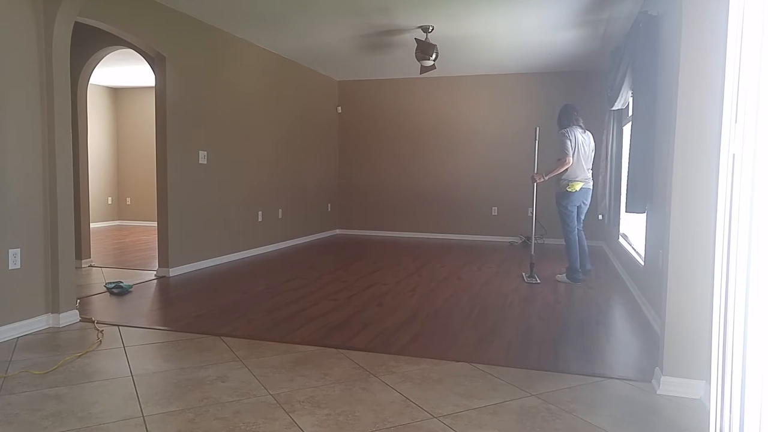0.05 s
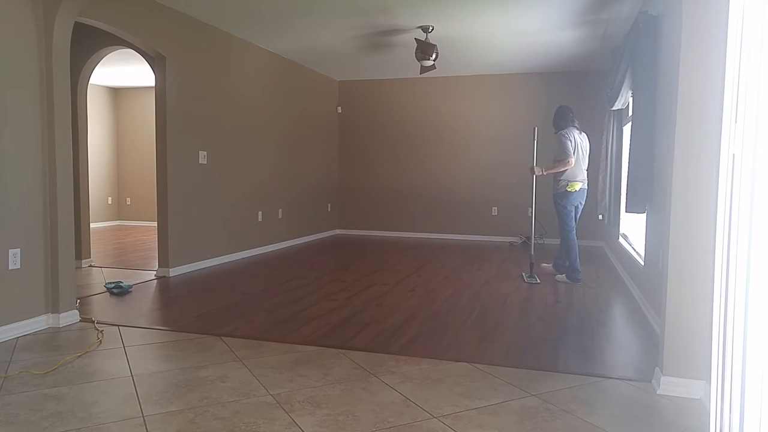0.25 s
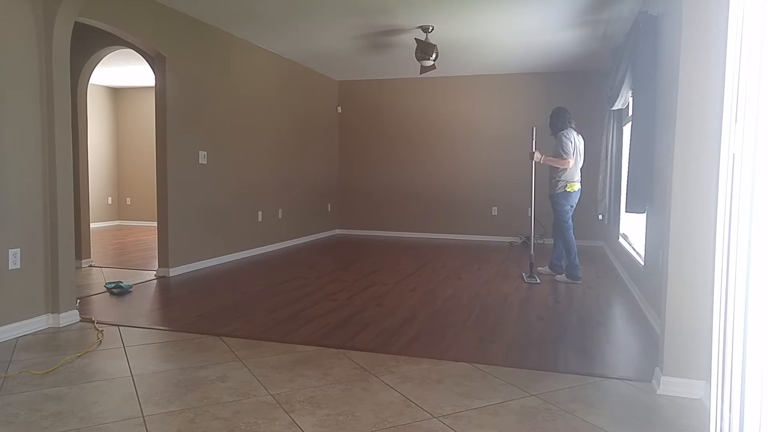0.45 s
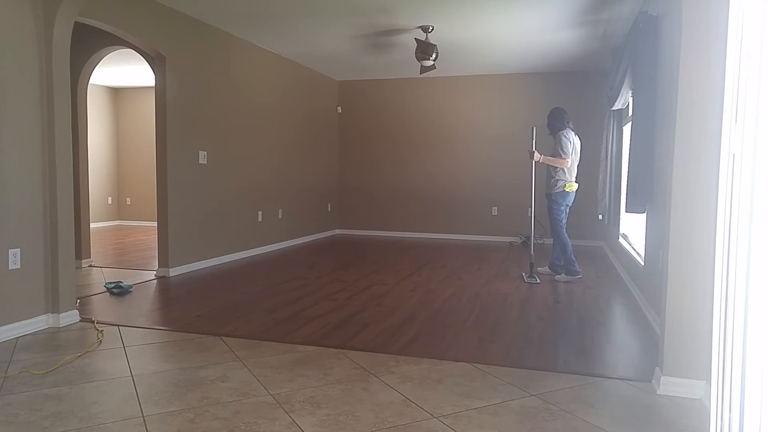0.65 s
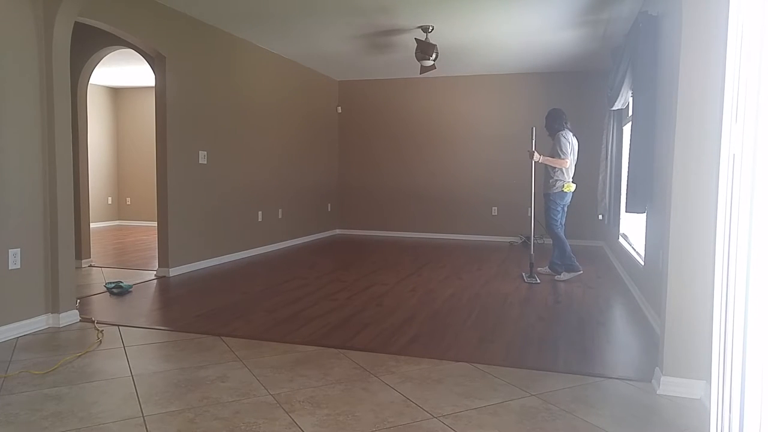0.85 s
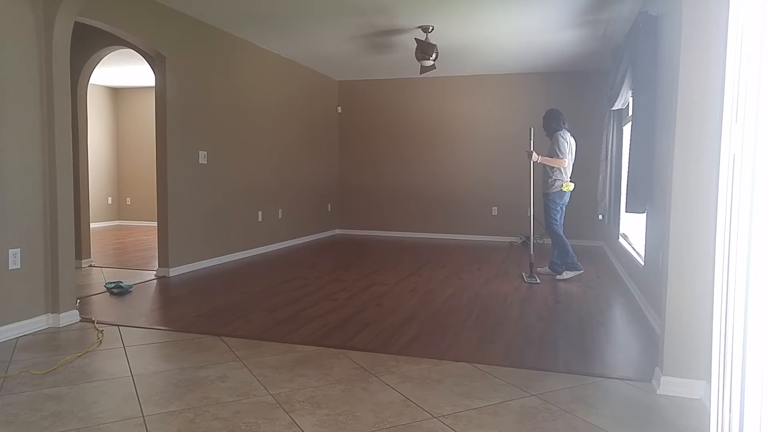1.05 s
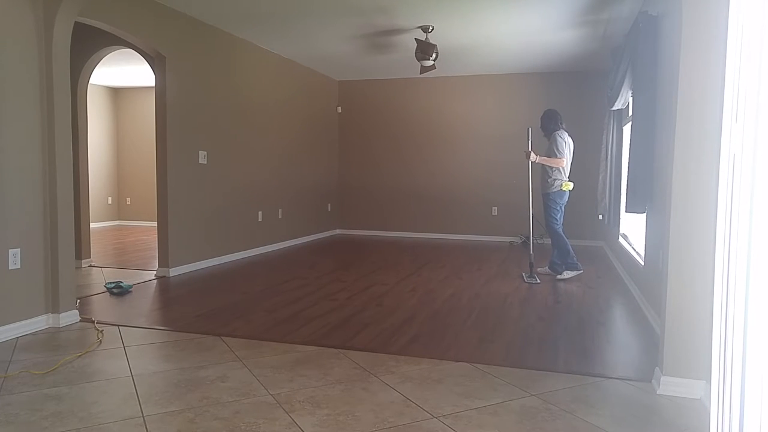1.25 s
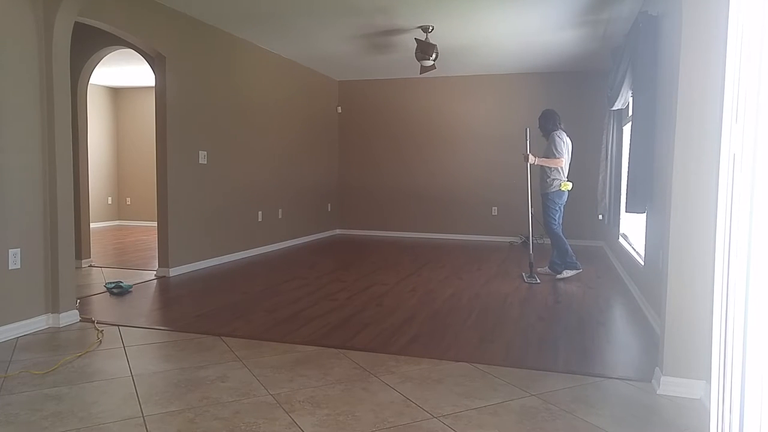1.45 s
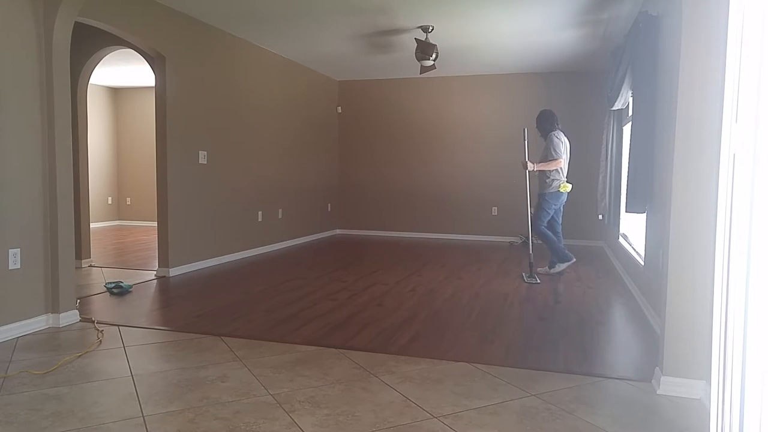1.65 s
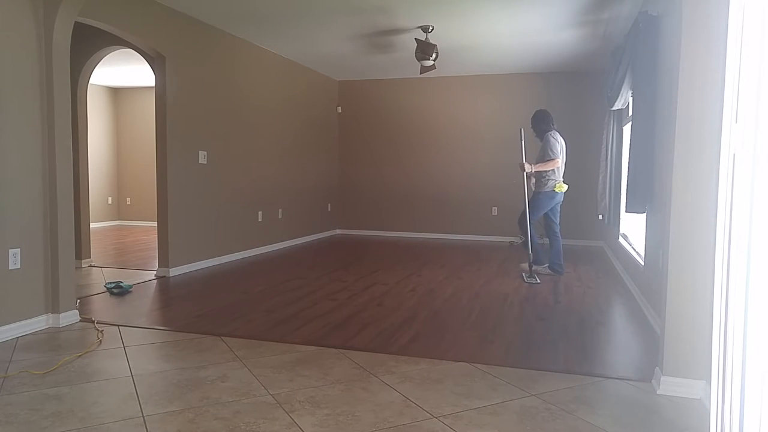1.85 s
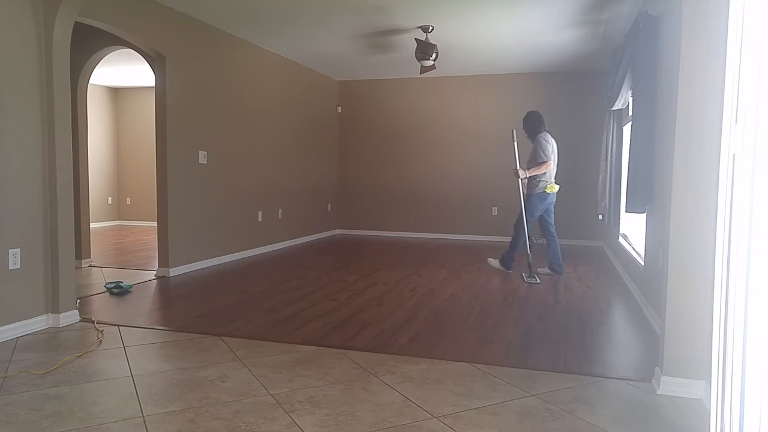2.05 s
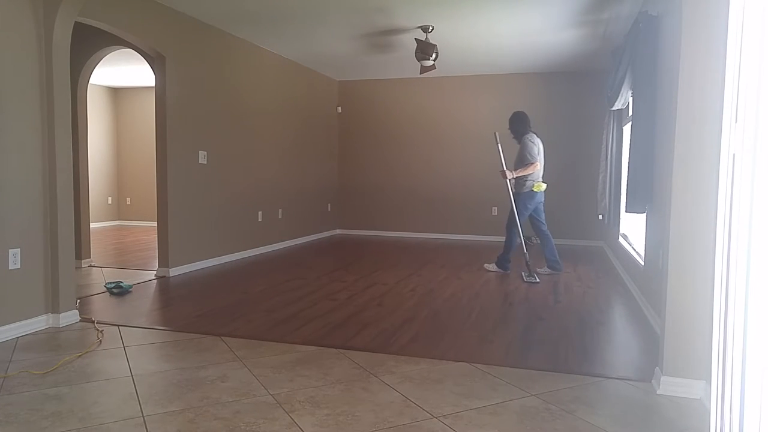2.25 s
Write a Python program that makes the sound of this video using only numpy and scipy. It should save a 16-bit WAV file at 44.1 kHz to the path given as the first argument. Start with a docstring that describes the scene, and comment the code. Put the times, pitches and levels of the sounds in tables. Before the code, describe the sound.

Heard from the far side of a bare, echoing room, a floor mop clacks against the boards, taps lightly and rubs along them. Its swivel joint gives a quick run of ticks near the end, over faint ventilation rumble.

```python
"""A long-handled floor tool rubs softly over laminate at the far side of an empty, echoing room.
At 0.2 s its head knocks and chatters, the boards thump and its loose swivel joint rattles; by 0.4 s it
settles with dull taps. It slides on, catching around 1.5 s, and at 1.8 s the joint sticks and slips in
a quick run of ticks. Throughout, two microphones hear mostly the room, over a low ventilation rumble."""
import numpy as np
import sys
import numpy as np
from scipy import signal
from scipy.fft import rfft, irfft, next_fast_len
from scipy.io import wavfile

SR = 44100
rng = np.random.default_rng(int(sys.argv[2]) if len(sys.argv) > 2 else 0)


def master_out(mix):
    """Clip the mix to full scale and print it as 16-bit PCM to the path in sys.argv[1]."""
    frames = np.transpose(np.atleast_2d(mix))
    ceiling = np.clip(frames, -1, 1)
    pcm = np.round(ceiling * 32767).astype(np.int16)
    wavfile.write(sys.argv[1], SR, pcm)


N = 101429
TIME = np.arange(N) / SR
FFT_SIZE = next_fast_len(N + SR // 10)
FFT_HZ = np.fft.rfftfreq(FFT_SIZE, 1 / SR)
LN_1000 = np.log(1000)  # amplitude falls a thousandfold (60 dB) in one T60

# Impact and rebounds of the head: t/s, level/dB (levels in all tables are relative)
IMPACTS = [(0.205, 2.5), (0.2111, -6.5), (.2222, -10.5), (0.2301, -9), (0.2451, -12)]
# Modes of head and boards: f/Hz, level/dB, T60/s
IMPACT_MODES = [(242, -28, .12), (355, -27.5, 0.072), (388.8, -20, 0.093), (633.5, -18, 0.066),
                (700, -27, .06), (756, -17, 0.026), (829, -8.5, 0.021), (910, -14, 0.024),
                (1040, -13, 0.018), (1280, -26, 0.035), (1402, -24, 0.024), (1853, -44, 0.069),
                (2233, -34.5, 0.042)]
# Spectrum of one contact's crack: f/Hz, level/dB
CRACK_SPECTRUM = [(60, -34), (140, -30), (280, -4.5), (380, -29), (500, -3.5), (900, 11.5), (1500, 1),
                  (2500, -6), (3100, -14.5), (4500, -14), (10000, -19.5), (15000, -43)]
def knock(crack_db=11.5, scatter_db=0.5):
    """Impact excitation: each contact cracks and rings the modes in a mix of its own."""
    sound = from_db(crack_db) * colour(clicks(IMPACTS), CRACK_SPECTRUM)
    times, levels = np.transpose(IMPACTS)
    for hz, db, t60 in IMPACT_MODES:
        delay = rng.random(len(times)) / hz  # rebounds meet the mode at a random phase
        delay[0] = 0
        scatter = scatter_db * rng.standard_normal(len(times))
        sound = sound + ring(clicks(zip(times + delay, levels + scatter)), [(hz, db, t60)])
    return low_cut(sound, hz=352)

# Low modes of the floating boards: f/Hz, level/dB, T60/s
BOARD_MODES = [(302, -26, 0.054), (368.7, -20, 0.22)]
def thump():
    """Free vibration: the boards ring on after the first blow."""
    return low_cut(ring(clicks(IMPACTS[:1]), BOARD_MODES), hz=352)

# Contacts of the settling head: t/s, level/dB
SETTLING_TAPS = [(.368, -7), (.381, -6), (.4085, 0)]
# Modes they excite: f/Hz, level/dB, T60/s
SETTLING_MODES = [(750, -29, .04), (900, -38, .02)]
def settling():
    """Damped resonance: light contacts ring briefly as hollow taps."""
    return low_cut(ring(clicks(SETTLING_TAPS), SETTLING_MODES), hz=360)

# Spectrum of the joint's rattle: f/Hz, level/dB
RATTLE_SPECTRUM = [(1500, -3), (3000, -4.5), (4200, 0), (5500, -20), (7000, 2.5), (10000, -5.5),
                   (12000, -12), (15000, -33)]
# Slips of the joint: t/s, level/dB
SLIPS = [(1.8290, -8), (1.8319, -8), (1.8363, 1), (1.8402, -4.5), (1.8446, -13), (1.8508, -9)]
# Modes of the joint: f/Hz, level/dB, T60/s
SWIVEL_MODES = [(5400, -43, .004), (6600, -26, .005), (7100, -24.5, .005), (8700, -34, .004),
                (9700, -34, .004)]
def swivel(rattle_db=-21, centre_s=.215, width_s=.0032):
    """Backlash and stick-slip: the loose joint rattles from the knock; later each slip rings a tick."""
    shake = np.exp(-.5 * ((TIME - centre_s) / width_s) ** 2)
    rattle = colour(rms_one(grains(per_s=830)) * shake, RATTLE_SPECTRUM)
    return from_db(rattle_db) * rattle + ring(clicks(SLIPS), SWIVEL_MODES)

# Envelopes of the head's rub and the pad's swish: t/s, level/dB
RUB_ENVELOPE = [(0, -41), (.11, -41.5), (.17, -47), (.4, -43), (.72, -44.5), (.93, -51), (1.16, -47.5),
                (1.36, -49.5), (1.46, -38.5), (1.5, -49), (1.56, -42), (1.62, -58.5), (1.9, -55.5),
                (2.3, -83)]
SWISH_ENVELOPE = [(0, -66), (.06, -58.5), (.1, -45.5), (.18, -61), (.45, -60.5), (.6, -57.5), (.76, -57.5),
                  (.9, -77), (1.0, -63), (1.12, -60), (1.22, -73), (1.36, -55.5), (1.5, -62.5), (1.65, -57),
                  (1.76, -66), (2.09, -61.5), (2.25, -98)]
# Their spectra: f/Hz, level/dB
RUB_SPECTRUM = [(60, -50.5), (150, 0.5), (260, -7), (360, -0.5), (510, -8.5), (650, 2), (950, 2),
                (1300, -4.5), (2150, -8.5), (3000, -19), (5000, -26.5), (12000, -37)]
SWISH_SPECTRUM = [(1500, -32), (3500, 11.5), (5000, 4), (7000, 10), (10000, 5.5), (12500, 3.5),
                  (15500, -19)]
# Catches of the head on the boards: t/s, level/dB
HEAD_CATCHES = [(1.437, 0), (1.474, 0), (1.562, 0), (1.601, -19.5)]
def sliding():
    """Friction noise: the head grates over tiny contacts and catches at times, while its pad swishes."""
    rub = rms_one(colour(grains(per_s=1500), RUB_SPECTRUM)) * envelope(RUB_ENVELOPE)
    swish = rms_one(colour(rng.standard_normal(N), SWISH_SPECTRUM)) * envelope(SWISH_ENVELOPE)
    return rub + swish + colour(clicks(HEAD_CATCHES), RUB_SPECTRUM)

def direct(x, left_lag_s=.00032):
    """Path difference: sound from the tool, on the right, reaches the left microphone later."""
    return np.array([np.interp(TIME - left_lag_s, TIME, x), x])

# Reverberation time of the room: f/Hz, T60/s
REVERB_TIMES = [(100, 0.27), (350, 0.89), (800, 0.84), (1400, 1.0), (2500, 0.68), (7000, 0.71),
                (13000, 0.58)]
def room(x, early_db=-11, early_t60_s=0.047):
    """Reverberation: early reflections and a tail dying band by band, drawn anew for each spot."""
    spectrum = rfft(diffuse_noise(), FFT_SIZE)
    centres, t60s = np.transpose(REVERB_TIMES)
    tail = 0
    for share, t60 in zip(np.eye(len(centres)), t60s):
        band_gain = at_hz(np.column_stack([centres, share]), FFT_HZ)
        band = irfft(spectrum * band_gain, FFT_SIZE)[:, :N]
        tail = tail + band * np.exp(-LN_1000 * TIME / t60) * np.sqrt(2 * LN_1000 / SR)
    early = diffuse_noise() * np.exp(-LN_1000 * TIME / early_t60_s)
    response = tail + from_db(early_db) * rms_one(early) / np.sqrt(N)
    return signal.fftconvolve(x[None], response, axes=1)[:, :len(x)]

def moving_room(x, spots=3):
    """Reverberation of a moving source: the sound crossfades between the echoes of a few spots."""
    lead = SR // 10
    x = np.concatenate([x[lead:0:-1], x])  # mirrored lead-in: the echo is already under way
    place = np.linspace(0, 4 * np.pi, len(x))
    echo = sum(room(x * np.cos(place + np.pi * k / spots)) for k in range(spots))
    return echo[:, lead:] * np.sqrt(2 / spots)

# Spectrum of the steady background: a low rumble, with narrow peaks near 256 and 358 Hz: f/Hz, level/dB
VENTILATION_SPECTRUM = [(18, -63), (30, -50), (42, -4), (62, 5.5), (90, 2.5), (120, -3), (155, -1.5),
                        (200, -15), (256, 4), (305, -14.5), (358, -1.5), (420, -6), (520, -8), (700, -3.5),
                        (950, -1.5), (1400, -12), (2100, -14), (3200, -23), (9000, -27.5), (15000, -43.5)]
def ventilation():
    """Stationary noise: a low rumble fills the room evenly."""
    return rms_one(colour(diffuse_noise(), VENTILATION_SPECTRUM))

# Likeness of the sound at the two microphones: f/Hz, correlation
CORRELATION = [(60, 0.98), (350, .9), (600, 0.62), (950, -0.062), (1500, -.55), (2200, 0.17),
               (4000, -0.013), (6000, 0.016)]
def diffuse_noise():
    """Diffuse field: white noise from all directions is partly correlated at two points."""
    mid, side = rfft(rng.standard_normal((2, FFT_SIZE)))
    alike = at_hz(CORRELATION, FFT_HZ)
    pair = np.sqrt(1 + alike) * mid + np.sqrt(1 - alike) * side * [[1], [-1]]
    return rms_one(irfft(pair, FFT_SIZE)[:, :N])

def ring(x, modes):
    """Modal superposition: each impulse starts decaying sines of alternating sign."""
    sound = 0
    for k, (hz, db, t60) in enumerate(modes):
        radius, angle = np.exp(-LN_1000 / (t60 * SR)), 2 * np.pi * hz / SR
        mode = signal.lfilter([0, np.sin(angle)], [1, -2 * radius * np.cos(angle), radius ** 2], x + 1e-18)
        sound = sound + (-1) ** k * from_db(db) * mode
    return sound

def grains(per_s, spread_db=3):
    """Shot noise: tiny contacts of uneven size at random moments."""
    size = from_db(-spread_db * np.clip(rng.standard_normal(N), -2, 2)) * rng.choice([-1, 1], N)
    return size * (rng.random(N) < per_s / SR)

def clicks(rows):
    """Impulse train from rows of t/s, level/dB."""
    train = np.zeros(N)
    for t, db in rows:
        train[int(t * SR)] += from_db(db)
    return train

def low_cut(x, hz):
    """Low cut: the bass below the given frequency is removed."""
    return signal.sosfilt(signal.butter(2, hz, "high", fs=SR, output="sos"), x)

def colour(x, points):
    """Minimum-phase filter from rows of f/Hz, level/dB; folding the cepstrum makes it causal."""
    size = 2 * next_fast_len(N)
    gain = from_db(at_hz(points, np.fft.rfftfreq(size, 1 / SR)))
    cepstrum = irfft(np.log(gain))
    cepstrum[1:size // 2] *= 2
    cepstrum[size // 2 + 1:] = 0
    return irfft(rfft(x, size) * np.exp(rfft(cepstrum)))[..., :x.shape[-1]]

def at_hz(points, hz):
    """Interpolation on a log-frequency axis."""
    f, value = np.transpose(points)
    return np.interp(np.log(np.maximum(hz, 1)), np.log(f), value)

def envelope(points):
    """Amplitude envelope from rows of t/s, level/dB."""
    return from_db(np.interp(TIME, *np.transpose(points)))

def from_db(db):
    """Level to amplitude ratio."""
    return 10 ** (np.asarray(db) / 20)

def rms_one(x):
    """Normalisation to unit rms."""
    return x / np.sqrt(np.mean(x ** 2) + 1e-20)

def scene():
    """Superposition: the tool's direct and reverberant sound add to the ventilation."""
    slide, hit, taps, joint = sliding(), knock(), settling(), swivel()
    tool = from_db(-15) * slide + from_db(-11.5) * hit + from_db(5) * taps + from_db(-4.5) * joint
    air = from_db(-50) * ventilation()
    echo = room(hit + taps) + room(joint) + moving_room(slide)
    return direct(tool + thump()) + echo + air

# Right microphone's response over the left's: f/Hz, level/dB
RIGHT_EXCESS = [(500, 0), (800, -1), (1300, 6.5), (2000, 6.5), (2800, -1.5), (4200, -1.5), (5300, 11),
                (7000, 13), (9500, 17), (12500, 4.5), (15000, 0.5)]
# Narrow dips at the microphones' place and ports: f/Hz, level/dB
RESPONSE_DIPS = [(440, -0.5), (515, -5), (570, -0.5), (7450, -1.5), (7800, -14.5), (8150, -2.5)]
def record(dry, hiss_db=-65, cutoff_hz=15700):
    """Frequency response: the right microphone is brighter; both have dips, hiss and a steep top cut."""
    left = colour(dry[0], [(hz, -db / 2) for hz, db in RIGHT_EXCESS])
    right = colour(dry[1], [(hz, db / 2) for hz, db in RIGHT_EXCESS])
    pair = colour(np.array([left, right]), RESPONSE_DIPS)
    hiss = from_db(hiss_db) * rng.standard_normal((2, N))
    return signal.sosfilt(signal.ellip(12, .1, 80, cutoff_hz, fs=SR, output="sos"), pair + hiss)

dry = scene()
out = record(dry)
master_out(out)
```